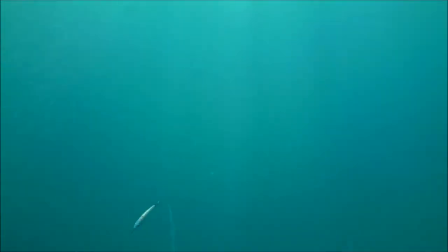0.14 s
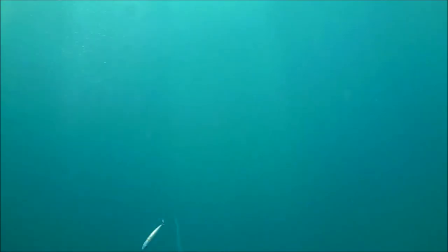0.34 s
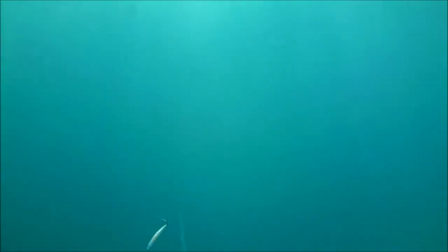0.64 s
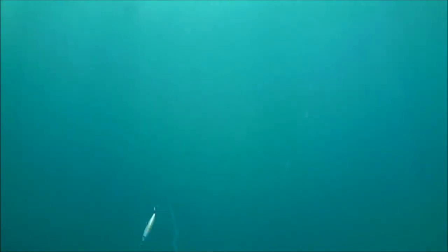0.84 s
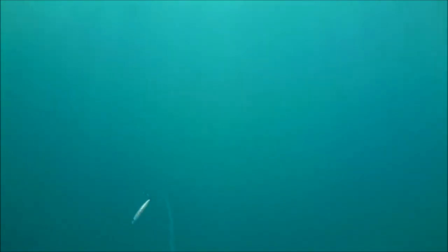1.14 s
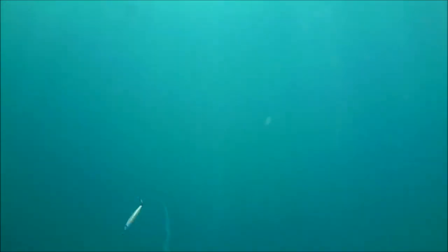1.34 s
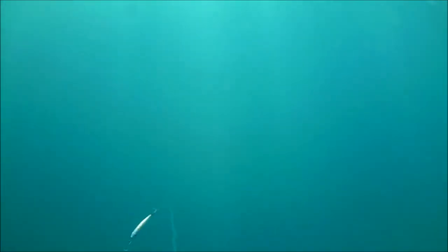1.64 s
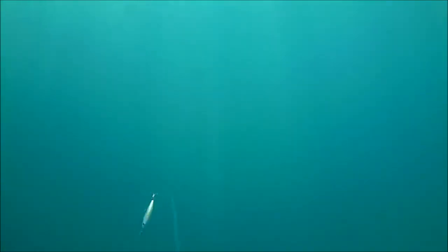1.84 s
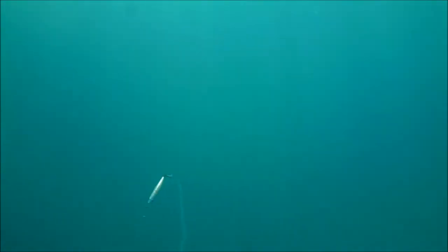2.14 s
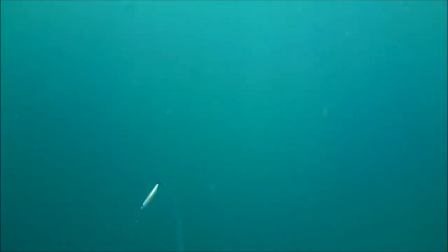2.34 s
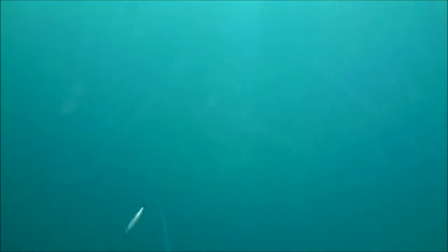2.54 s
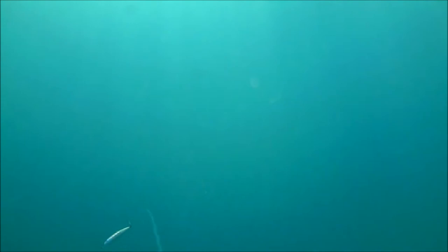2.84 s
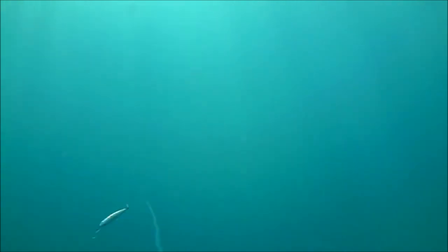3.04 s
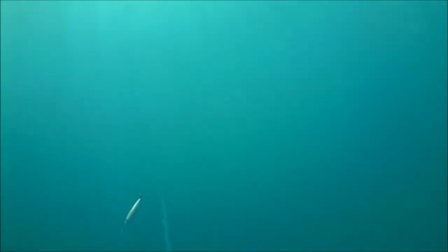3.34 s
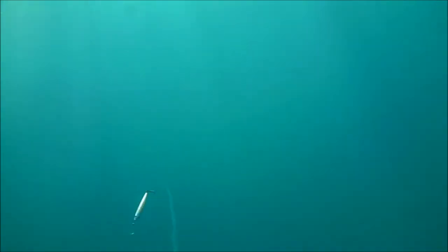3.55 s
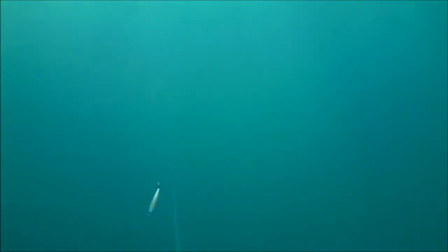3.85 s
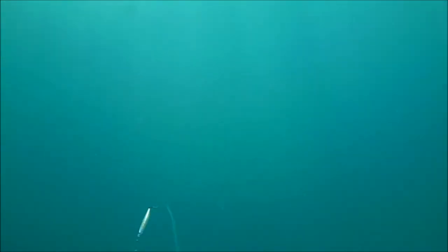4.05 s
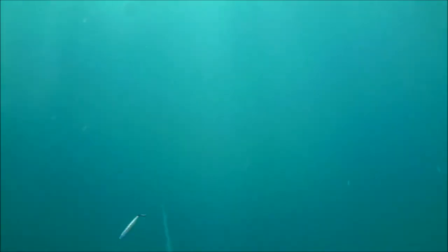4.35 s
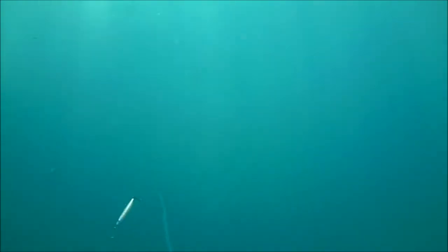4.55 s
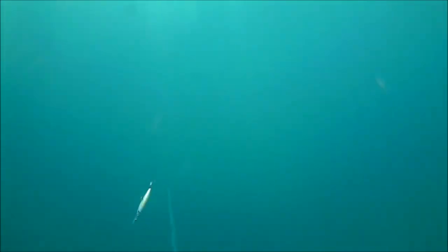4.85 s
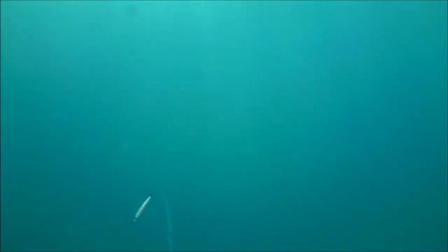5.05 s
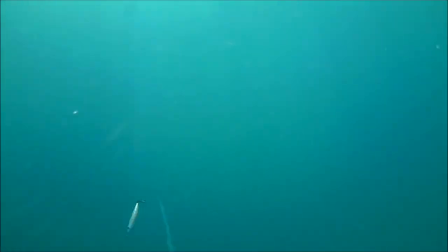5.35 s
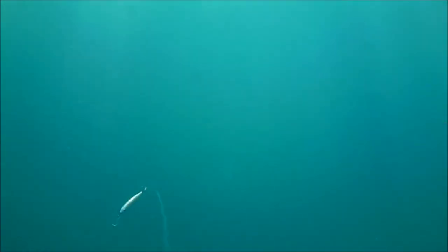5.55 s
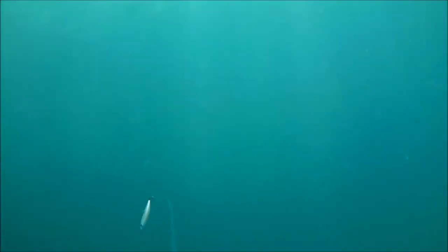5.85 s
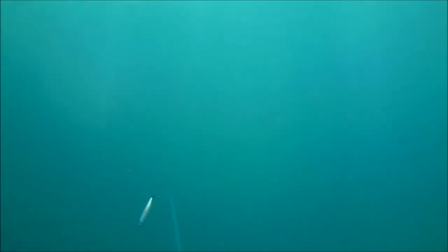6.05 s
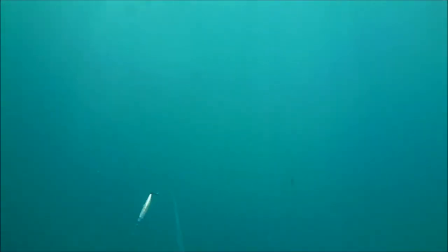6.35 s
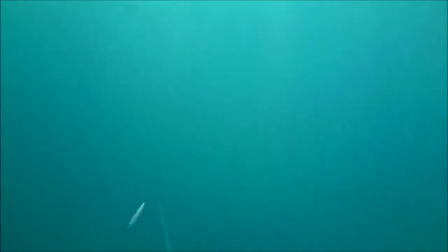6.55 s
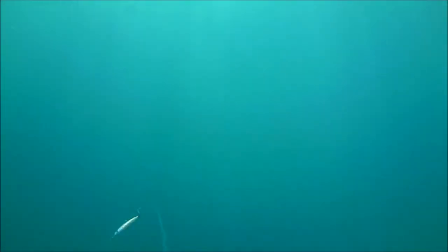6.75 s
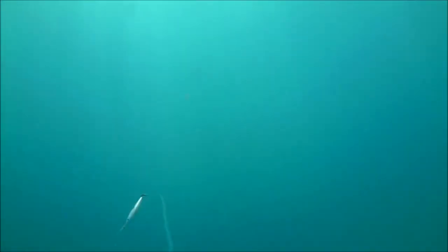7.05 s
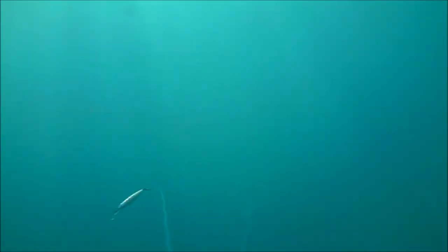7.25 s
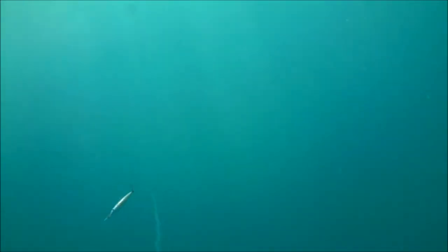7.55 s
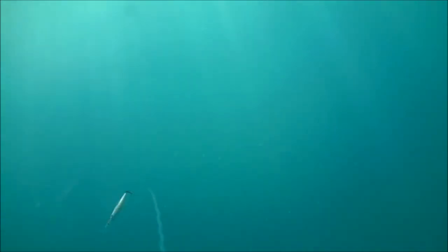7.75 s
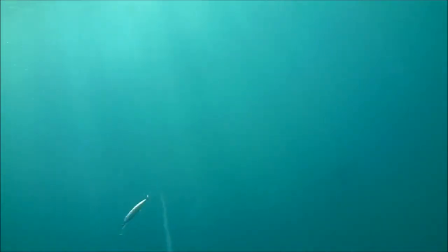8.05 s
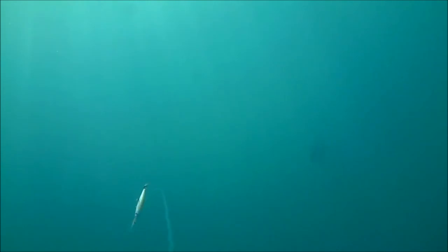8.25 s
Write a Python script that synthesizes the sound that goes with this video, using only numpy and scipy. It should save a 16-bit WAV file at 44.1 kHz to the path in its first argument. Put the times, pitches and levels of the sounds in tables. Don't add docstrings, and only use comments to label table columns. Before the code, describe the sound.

Underwater tow rush: harsh, ringing water noise throbbing about forty times a second, surging with the swell, a rough wavering whistle inside.

```python
import sys
import numpy as np
from scipy import signal
from scipy.io import wavfile

SR = 44100
rng = np.random.default_rng(int(sys.argv[2]) if len(sys.argv) > 2 else 0)


def boost_factor(decibels):
    exponent = np.asarray(decibels, float) / 20
    return 10 ** exponent


def wav_record(signal):
    frames = np.transpose(np.atleast_2d(signal))
    bounded = np.clip(frames, -1, 1)
    quanta = np.round(bounded * 32767).astype(np.int16)
    wavfile.write(sys.argv[1], SR, quanta)


N = 370440

TYPICAL_FLOW_DB, TYPICAL_STRUM_HZ = -21, 40


def in_time(rows):
    s, values = np.transpose(rows)
    return np.interp(np.arange(N) / SR, s, values)


def unit_power(x):
    return x / np.sqrt(np.mean(x ** 2))


def drift(rate):
    r = np.exp(-80 * np.pi * rate / SR)
    coarse = rng.standard_normal(N // 40 + 2002)
    slow = signal.lfilter([1], [1, -2 * r, r * r], coarse)[2000:]
    return np.interp(np.arange(N) / 40, np.arange(len(slow)), unit_power(slow))


def resonance(hz, width):
    r = np.exp(-np.pi * width / SR)
    top = (1 - r * r) / 2
    return [top, 0, -top, 1, -2 * r * np.cos(2 * np.pi * hz / SR), r * r]


def gate(start, length):
    out, first = np.zeros(N), round((start - .003) * SR)
    s = np.arange(round((length + .006) * SR)) / SR
    ramp = np.clip(np.minimum(s, s[-1] - s) / .006, 0, 1)
    out[first:first + len(s)] = np.sin(np.pi / 2 * ramp) ** 2
    return out


# time_s, strum_hz
TOW_STRUM = [(0.0, 39.02), (0.28, 28.31), (1.05, 42.13), (1.74, 33.63), (2.26, 41.29), (2.72, 42.96),
             (2.91, 41.65), (3.53, 34.51), (4.39, 40.71), (4.89, 42.07), (5.53, 35.02), (6.12, 39.75),
             (6.31, 40.43), (7.08, 46.23), (7.31, 45.48), (7.6, 40.85), (7.91, 41.03), (8.4, 50.01)]


def tow_line():
    strum_hz = in_time(TOW_STRUM)
    return .386 + np.cumsum(strum_hz) / SR, strum_hz - TYPICAL_STRUM_HZ


# time_s, flow_db
WATER_FORCE = [(0.0, -22), (.12, -23.5), (.28, -27), (.6, -22.5), (1.05, -20), (1.55, -22.5), (1.65, -23),
               (2.05, -23), (2.8, -17), (3.15, -21), (3.75, -24.5), (4.3, -19), (5.1, -20.5), (5.55, -23),
               (6.4, -20), (6.88, -17), (7.7, -20), (8.4, -17)]


def water_force():
    return in_time(WATER_FORCE)


def ring(modes, level_db, flow_db, turns, eddies, patchy_db):
    out = np.zeros(N)
    faster_db = flow_db - TYPICAL_FLOW_DB
    for hz, width, mode_db, swell, throb, lead in modes:
        depth = throb * (1.04 - 0.097 * faster_db)
        swing = 1 + np.clip(depth, 0, 1) * np.cos(2 * np.pi * (turns + lead))
        drive_db = swell * faster_db + patchy_db * (eddies + 0.45 * drift(12.0))
        steep = np.array([resonance(hz, 1.513 * width)] * 2)
        unit = np.sqrt(SR / (2.37 * width))
        turbulence = rng.standard_normal(N) * swing * boost_factor(drive_db)
        out += boost_factor(mode_db) * unit * signal.sosfilt(steep, turbulence)
    return boost_factor(level_db) * out


# pitch_hz, width_hz, level_db, swell_share (of flow swell), throb_depth (0-1), lead_turns
LOW_SHELL = [
    (548, 116, -5.5, -0.58, 0.17, 0.42),
    (758, 97, -10, 0.99, 0.98, 0.5),
]
MAIN_SHELL = [
    (1187, 147, -12.5, -0.69, 0.057, 0.29),
    (1432, 151, -4.5, -0.12, 0.22, 0.25),
    (1660, 237, -6.5, 0.11, 0.11, 0.34),
    (1871.5, 228, -3.5, 0.43, 0.3, 0.34),
    (2119, 148, -11, 0.79, 0.32, 0.42),
    (2477, 260, -18, 0.28, 0.35, 0.4),
    (2820, 140, -22, 0.59, 0.75, 0.34),
]
HIGH_SHELL = [
    (3230, 170, -6.5, -0.47, 0.68, 0.18),
    (3486, 238, 4.5, 0.2, 0.8, 0.36),
    (3708, 260, -2, 0.99, 1, 0.25),
    (4800, 900, -33, -.1, .45, .32),
    (5770, 410, -11.5, -0.67, 0.42, 0.39),
    (7150, 300, -47, -.2, .4, .32),
    (7840, 230, -20.5, -0.12, 0.92, 0.5),
    (7950, 600, -40, .1, .4, .32),
]


def shell_rush(flow_db, low_db, high_db, turns):
    eddies = 0.22 * drift(32) + 1.08 * drift(160)
    rush = ring(LOW_SHELL, flow_db + low_db + .1, flow_db, turns, eddies, patchy_db=-2.5)
    rush += ring(MAIN_SHELL, flow_db, flow_db, turns, eddies, patchy_db=0.48)
    rush += ring(HIGH_SHELL, flow_db + high_db - 6.5, flow_db, turns, eddies, patchy_db=2.08)
    return rush


def edge_whistle(turns, faster_hz, level_db, wander, lead):
    mean_hz = 624.7 + 5.5 * faster_hz
    sweep = 0.062 - 0.0046 * faster_hz
    locked, lock_db = cavity_lock()
    sweep = sweep * (1 - 0.49 * locked)
    wander = wander * (1 - 0.298 * locked)
    swing = np.cos(2 * np.pi * (turns + lead))
    hz = mean_hz * (.99 + 1.57 * sweep * swing + wander * drift(59.67))
    phase = 2 * np.pi * np.cumsum(hz) / SR
    tone = boost_factor(1.1 * drift(65)) * (np.sin(phase) + boost_factor(-4.5) * np.sin(2 * phase))
    cavity = signal.sosfilt([resonance(610, 350)], tone)
    return boost_factor(level_db + lock_db) * unit_power(cavity)


# pitch_hz, width_hz, depth_db
NOTCHES = [
    (928, 185, -15),
    (3000, 100, -6),
    (4380, 1040, -5),
    (6750, 460, -14),
]


def shell_filter(rush):
    for hz, width, depth_db in NOTCHES:
        rush -= (1 - boost_factor(depth_db)) * signal.sosfilt([resonance(hz, width)], rush)
    return signal.sosfilt(signal.butter(4, 310, "high", fs=SR, output="sos"), rush)


def line_hum(turns, faster_hz):
    return np.sqrt(2) * boost_factor(-49 + 0.34 * faster_hz) * np.cos(2 * np.pi * turns)


def buffeting(flow_db, rumble_db, swell):
    dull = signal.butter(4, [20, 200], "band", fs=SR, output="sos")
    lumps = boost_factor(rumble_db + swell * (flow_db - TYPICAL_FLOW_DB) + .8 * drift(8.2))
    return lumps * unit_power(signal.sosfilt(dull, rng.standard_normal(N)))


def overload(x):
    return np.clip(x + .0011, -.2, .2)


# start_s, length_s, flow_db
LULLS = [
    (.255, 0.013, -3),
    (0.316, 0.032, -1.5),
    (0.473, 0.036, -1.5),
    (1.602, 0.044, -2),
    (1.756, 0.043, -2.5),
    (3.056, 0.032, -5),
]


def slack_water():
    return sum(lull_db * gate(start, length) for start, length, lull_db in LULLS)


# start_s, length_s, left_db
BLINKS = [
    (.466, .016, -11),
    (1.21, .024, -7),
    (2.238, .031, -50),
    (3.172, .02, -10),
    (3.968, .048, -60),
    (5.226, .009, -25),
    (5.855, .028, -10),
    (6.07, .024, -9),
    (6.203, .014, -14),
    (8.203, .024, -9),
]
# start_s, length_s, pitch_hz, width_hz, level_db
CHIRPS = [(0.454, .026, 7750, 150, -64), (1.208, .026, 5100, 300, -45), (1.208, .026, 6900, 120, -52),
          (1.27, 0.024, 6140, 120, -59), (2.217, 0.04, 5840, 90, -49), (2.224, 0.092, 7830, 90, -51),
          (3.171, .017, 5740, 90, -39), (3.973, 0.016, 5400, 700, -36), (3.988, 0.023, 4900, 200, -46),
          (3.99, 0.024, 5800, 90, -60), (5.218, .022, 4940, 90, -51), (6.033, .024, 6050, 200, -51),
          (6.062, 0.029, 5760, 120, -48), (6.195, 0.033, 5840, 200, -43), (8.184, 0.047, 5600, 400, -38)]


def treble_blinks(x):
    below = signal.cheby2(10, 60, 4600, fs=SR, output="sos")
    valley = signal.butter(3, [820, 1010], "band", fs=SR, output="sos")
    fragile = x - signal.sosfiltfilt(below, x) + signal.sosfiltfilt(valley, x)
    lost = sum(gate(start, length) * (1 - boost_factor(left_db)) for start, length, left_db in BLINKS)
    out, hiss = x - lost * fragile, rng.standard_normal(N)
    for start, length, hz, width, level_db in CHIRPS:
        narrow = signal.sosfilt([resonance(hz, width)] * 3, hiss)
        out += boost_factor(level_db) * gate(start, length) * unit_power(narrow)
    return out


# start_s, length_s, gain_db
LOCKS = [
    (2.216, .2, 2.5),
    (2.997, .3, 2.5),
    (7.255, .75, 3),
]


def cavity_lock():
    s, locked, lock_db = np.arange(N) / SR, 0, 0
    for start, length, gain_db in LOCKS:
        inside_s = np.minimum(s - start, start + length - s)
        share = np.clip(inside_s / 0.087 + .5, 0, 1)
        locked, lock_db = locked + share, lock_db + share * gain_db
    return locked, lock_db


def scene():
    turns, faster_hz = tow_line()
    flow_db = water_force()
    faster_db = flow_db - TYPICAL_FLOW_DB
    low_db = -14 + 0.043 * faster_db + 0.75 * drift(1.9)
    high_db = -13 + 1.46 * faster_db - 0.11 * faster_db ** 2 + 0.75 * drift(1.9)
    slack_db = slack_water()
    flow_db, high_db = flow_db + slack_db, high_db + 1.4 * slack_db
    rush = shell_rush(flow_db, low_db, high_db, turns)
    rush += edge_whistle(turns, faster_hz, flow_db + low_db - .6, wander=0.07505, lead=0.38)
    rush = shell_filter(rush)
    hum = line_hum(turns, faster_hz)
    return (rush + hum + buffeting(flow_db, rumble_db=-58.5, swell=0.36))[None]


def low_pass(x):
    return signal.sosfilt(signal.butter(12, 15760, fs=SR, output="sos"), x)


def record(dry):
    mix = treble_blinks(overload(dry))
    return low_pass(mix)


dry = scene()
out = record(dry)
wav_record(out)
```